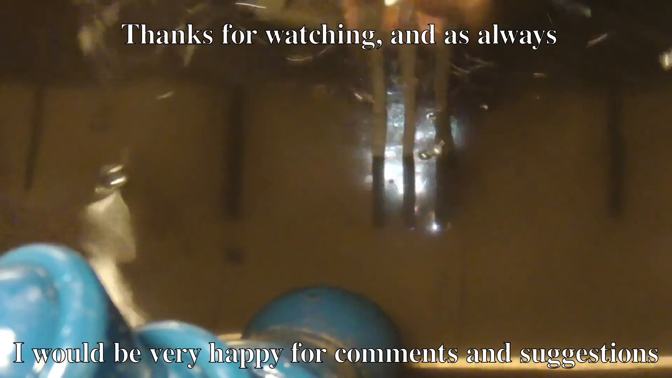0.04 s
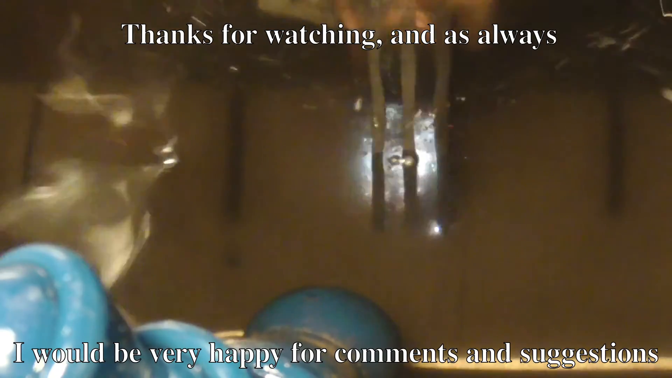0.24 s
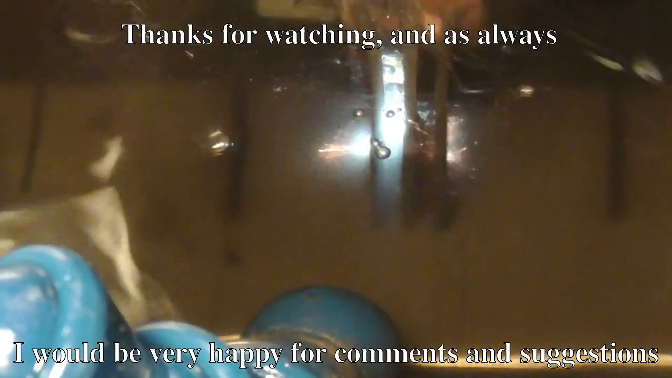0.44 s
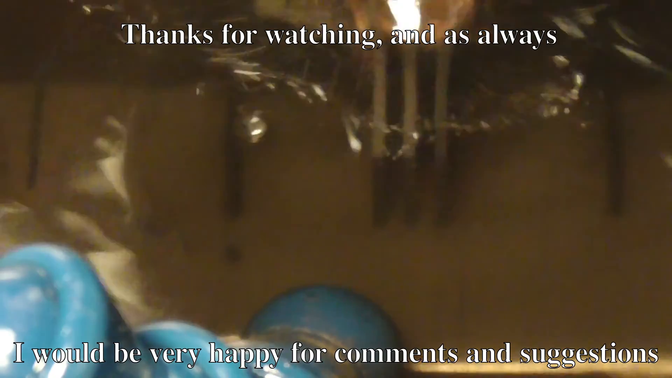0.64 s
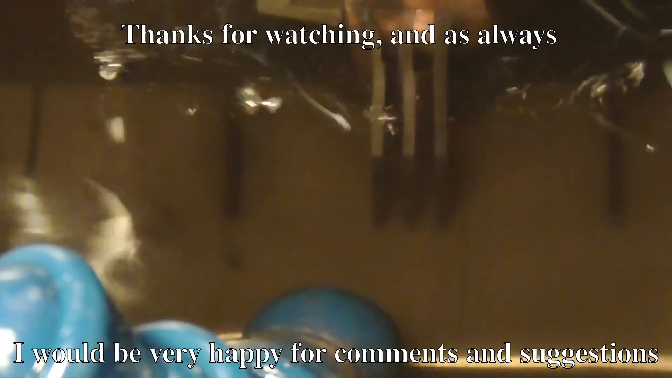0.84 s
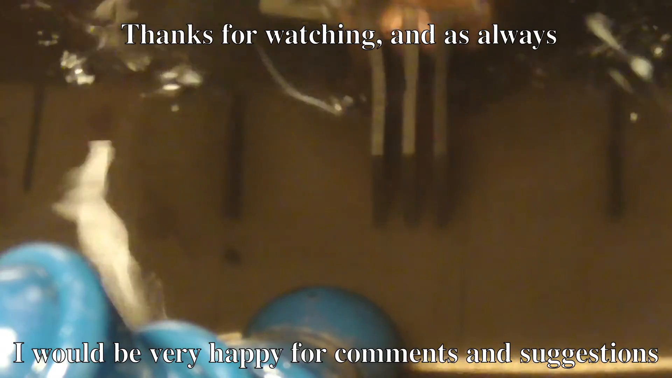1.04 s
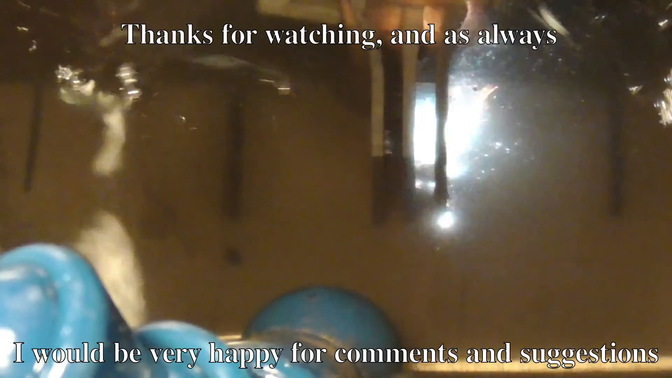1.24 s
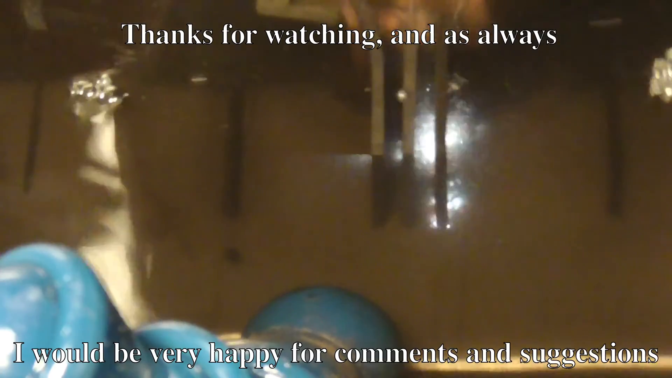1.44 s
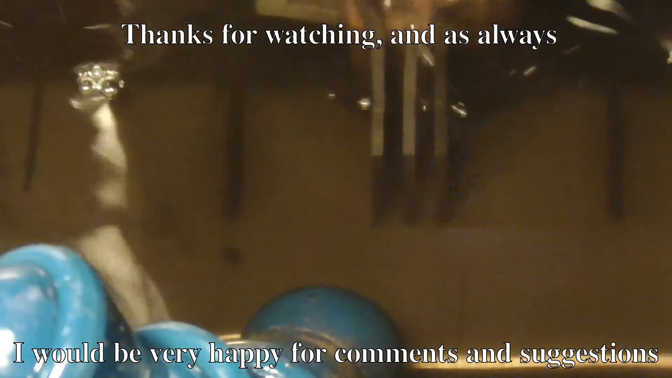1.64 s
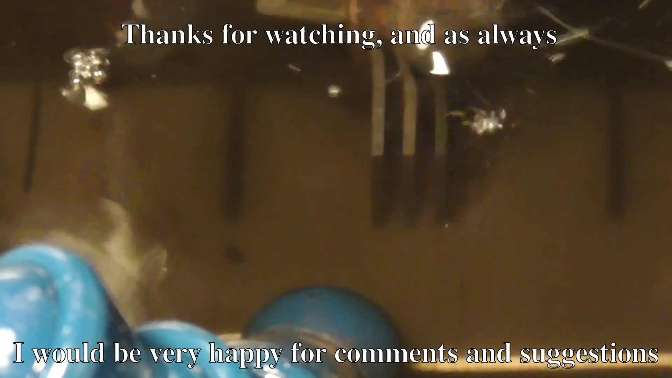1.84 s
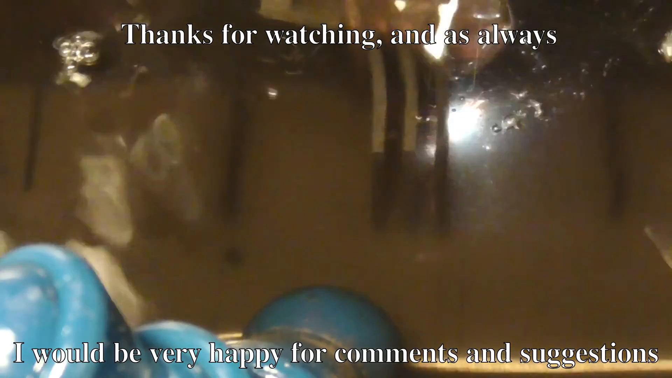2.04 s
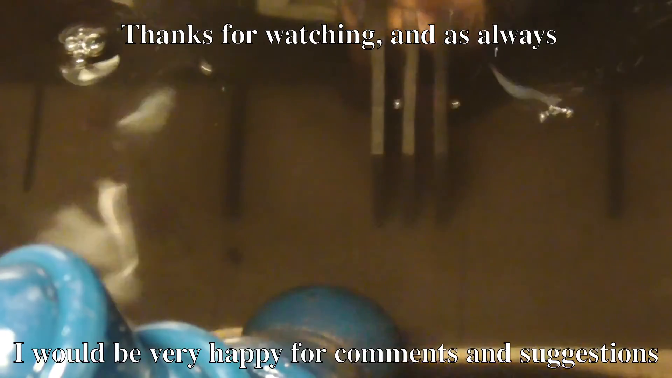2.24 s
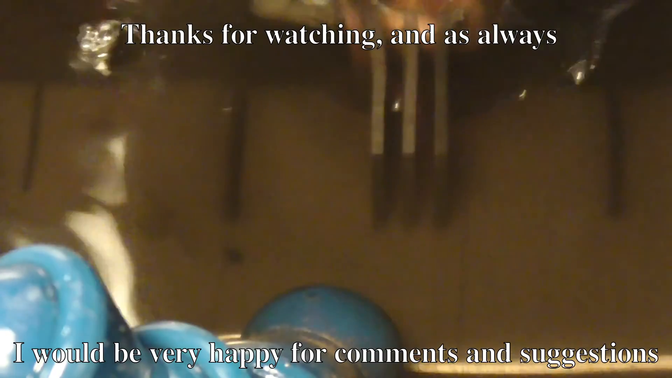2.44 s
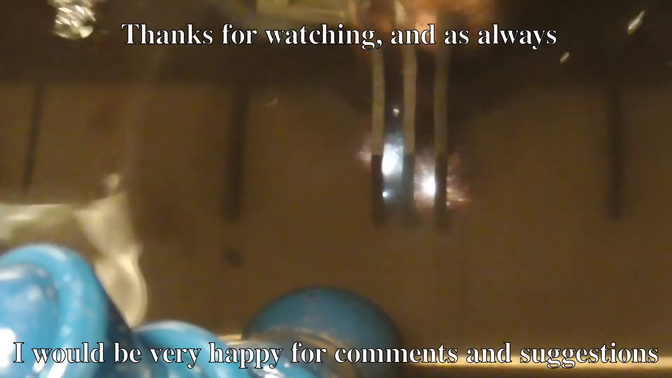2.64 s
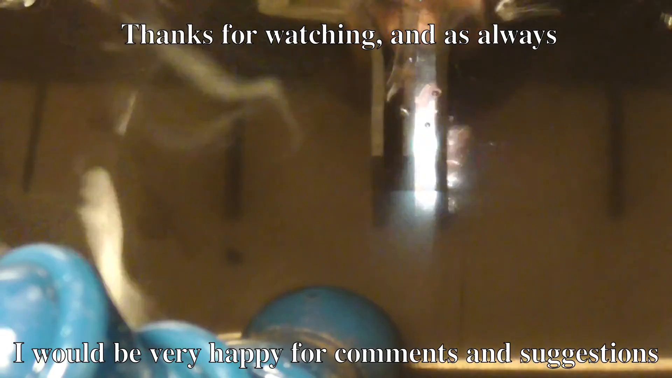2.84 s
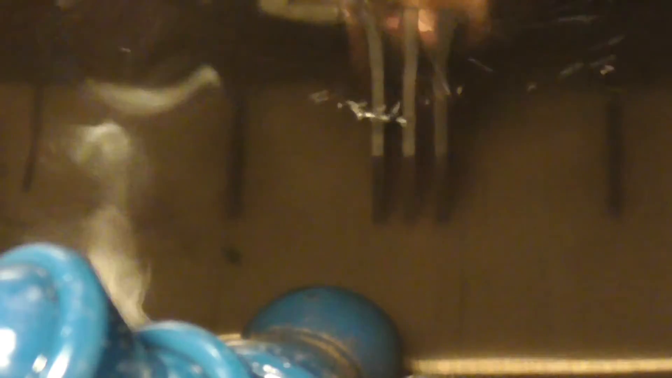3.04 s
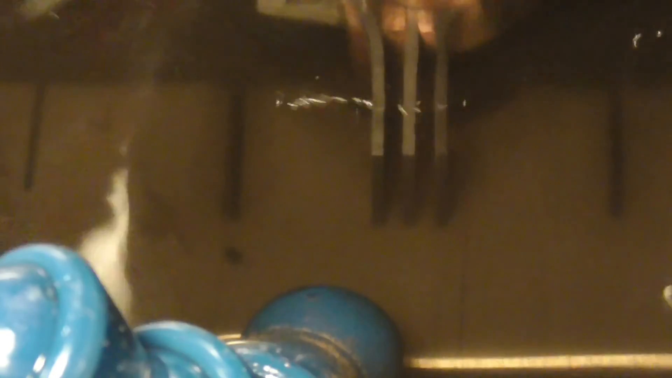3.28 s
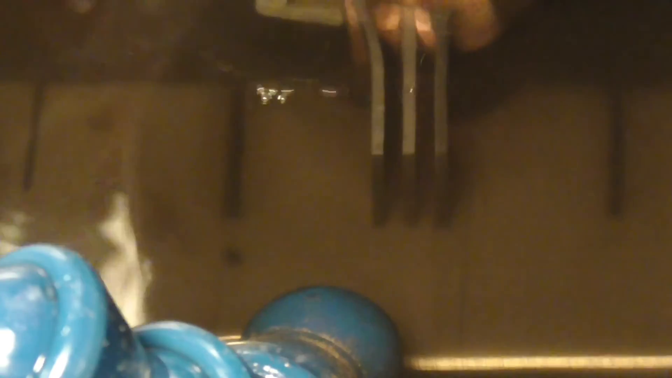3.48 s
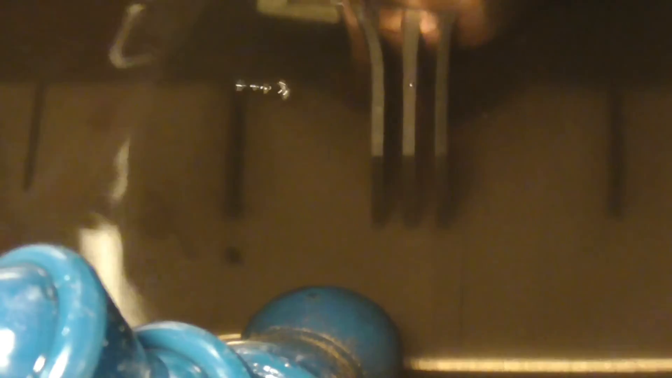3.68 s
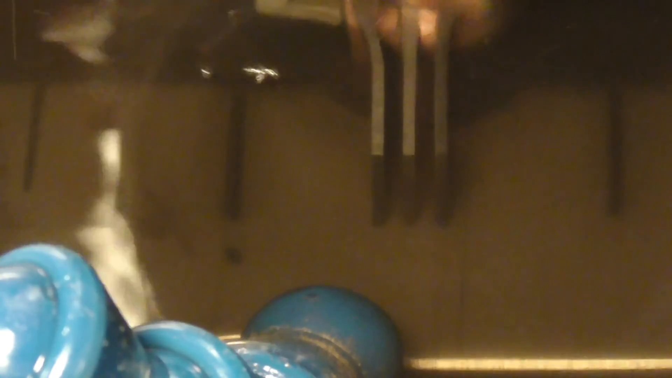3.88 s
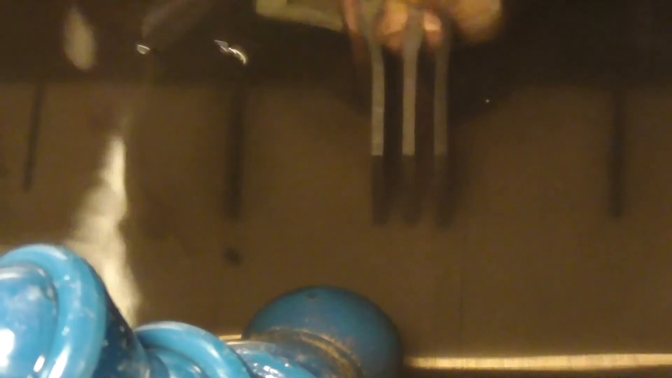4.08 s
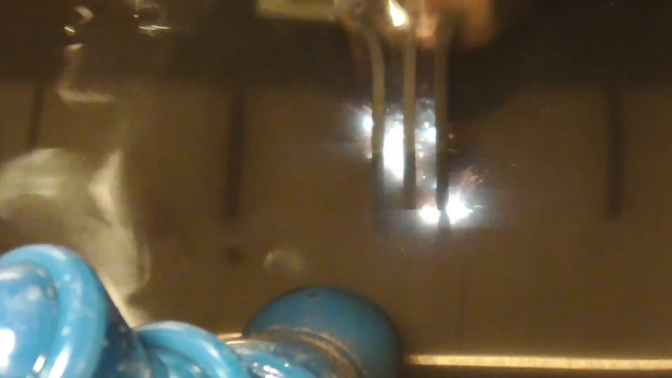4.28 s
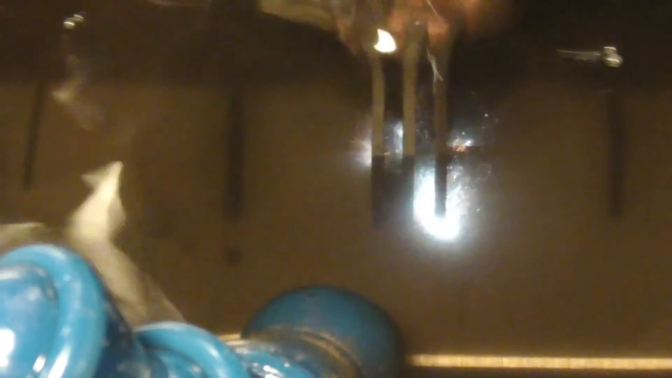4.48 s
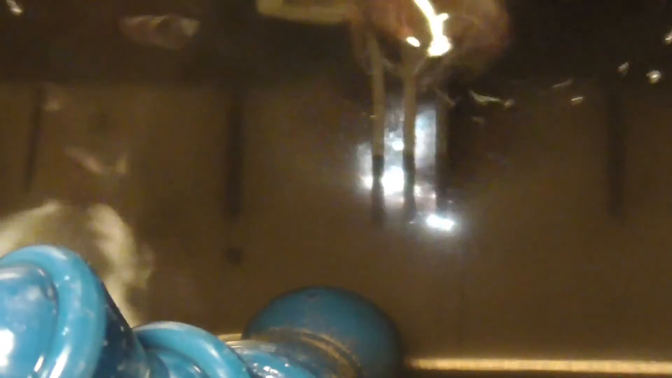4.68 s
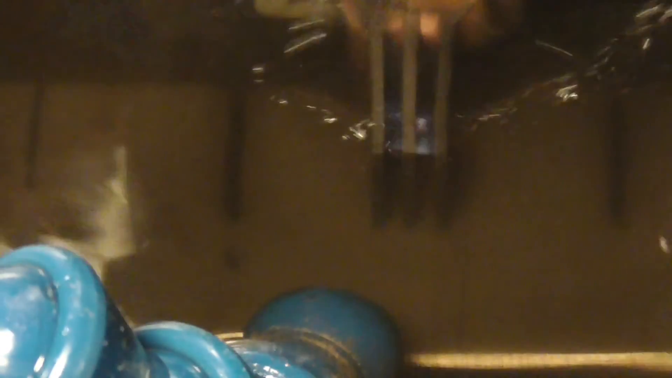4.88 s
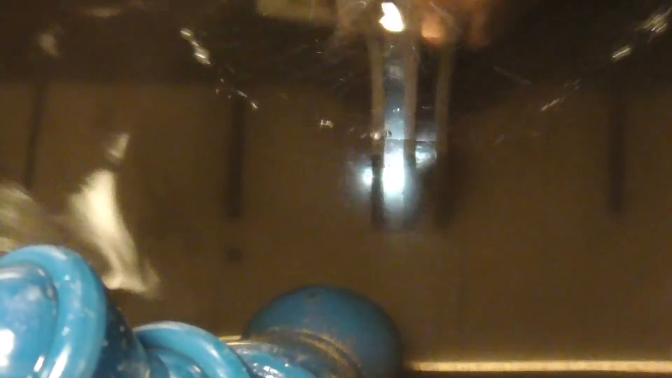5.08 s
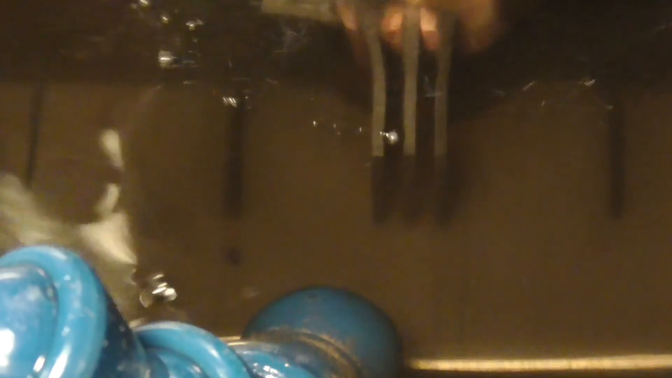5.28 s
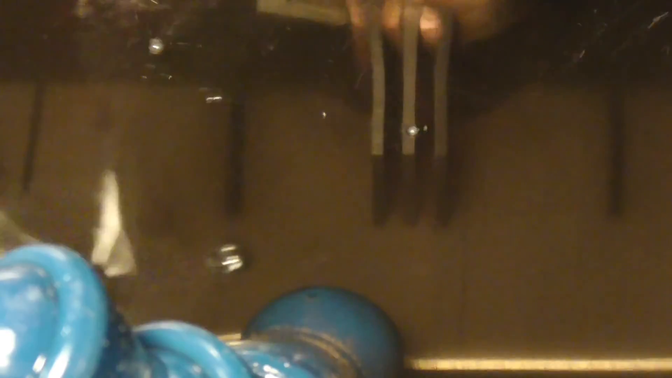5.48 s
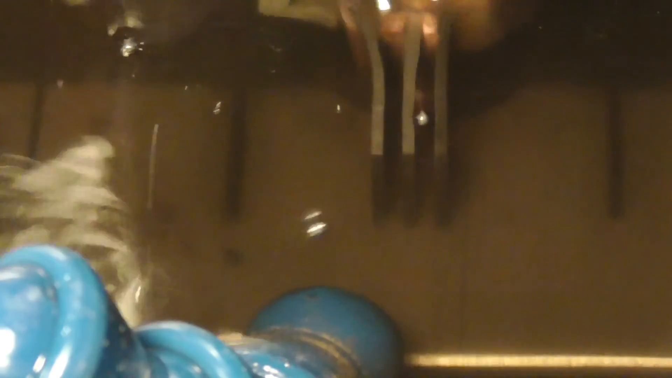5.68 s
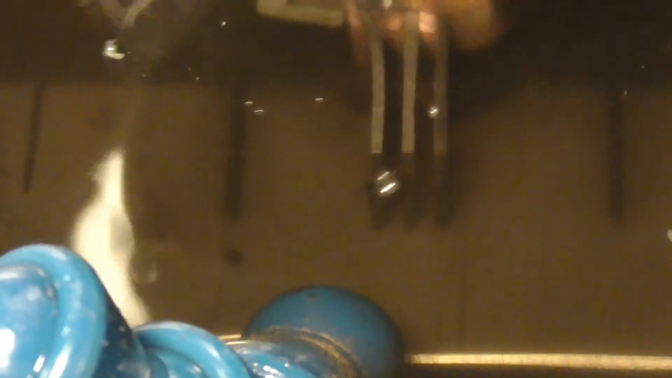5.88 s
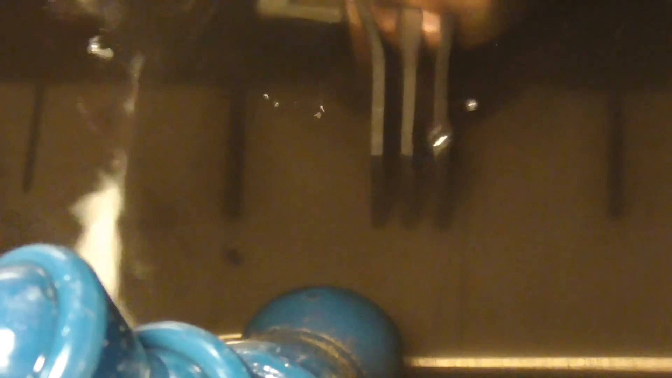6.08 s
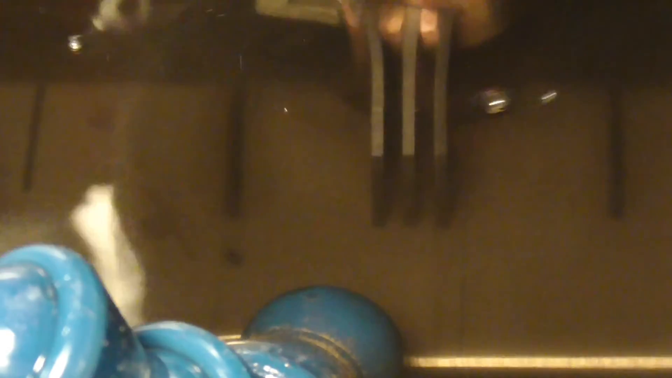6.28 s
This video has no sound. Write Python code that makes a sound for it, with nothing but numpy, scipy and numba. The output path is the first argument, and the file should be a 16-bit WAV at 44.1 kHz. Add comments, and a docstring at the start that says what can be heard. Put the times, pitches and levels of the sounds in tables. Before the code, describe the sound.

A steady pump and transformer hum with a rushing noise, leaning left, runs throughout. From 0 to 0.7 s, sharp electric snaps in liquid crackle in quick clusters, with brief sizzling arcs, hollow knocks and low pushes of gas, strongest near 0.6 s. Hum alone swells back until 1.33 s, when hard snaps return; from 1.5 to 1.72 s a long wet, buzzing arc sizzles with bubbly ringing, then separate cracks continue to about 2.2 s. After a pause, a strong snap at 2.66 s starts another cluster lasting to 3.1 s. Only the hum remains, rising, until 4.3 s, when a fizzing, bubbling arc runs to 4.7 s, ending in loud cracks near 4.75 s. Pairs of snaps follow at 4.9, 5.0, 5.1 and 5.2 s. From 5.3 s the hum recovers alone to the end. Close pickup, short workshop reverberation, dull extreme treble.

```python
"""A sharp snap over a steady hum, then more snaps in quick clusters and stretches of sizzling arc.
Electrodes spark in a liquid bath: each spark is a filtered impulse that rings its own gas pocket.
An arc is a dense swarm of small discharges; gas pockets knock, push and break up around them.
Pump and transformer lines hum over a rush of shaped noise, from the left.
A gain control ducks under the sparks and lets the hum swell back in the pauses."""
import sys
import numpy as np
from scipy import signal
from scipy.fft import rfft, irfft, next_fast_len
from scipy.io import wavfile
from scipy.ndimage import uniform_filter1d, map_coordinates
from numba import njit

SR = 44100
rng = np.random.default_rng(int(sys.argv[2]) if len(sys.argv) > 2 else 0)


def transcribe(signal):
    """Save signal, clipped to [-1, 1], as a 16-bit WAV file at the path in sys.argv[1]."""
    frames = np.atleast_2d(signal).T
    limited = np.clip(frames, -1, 1)
    pcm = np.round(limited * 32767).astype(np.int16)
    wavfile.write(sys.argv[1], SR, pcm)


N = 278712  # length in samples
# All levels below hold before the gain control.


def amp(db):
    """Logarithmic level: decibels to amplitude gain."""
    return 10 ** (np.asarray(db) / 20)


def unit(x):
    """Normalisation by mean power: x scaled to rms 1."""
    return x / np.sqrt(np.mean(x ** 2) + 1e-20)


def along(points, hz):
    """Interpolation over logarithmic frequency of (Hz, value) points."""
    f, v = np.transpose(points)
    return np.interp(np.log(hz + 1), np.log(f + 1), v)


def bumps(rows, hz):
    """Sum of Gaussian peaks and dips, in dB, from rows of (Hz, half width Hz, dB)."""
    return sum(db * np.exp(-.5 * ((hz - centre) / width) ** 2) for centre, width, db in rows)


def wobble(rate):
    """Band-limited random modulation: a smooth curve through `rate` random knots a second."""
    knots = rng.standard_normal(int(N * rate / SR) + 4)
    return map_coordinates(knots, [np.arange(N) * rate / SR])


def filtered(x, response):
    """Linear filtering: the spectrum of x times a response of frequency."""
    m = next_fast_len(N + SR // 2)
    return irfft(rfft(x, m) * response(np.fft.rfftfreq(m, 1 / SR)), m)[..., :N]


def causal(db):
    """Minimum phase: a response with these gains that rings only after it is struck."""
    cepstrum = irfft(np.log(amp(db)))
    half = cepstrum.shape[-1] // 2
    fold = np.r_[1, np.full(half - 1, 2), 1, np.zeros(half - 1)]
    return np.exp(rfft(cepstrum * fold))


def coloured(x, db_at, size=2048):
    """Convolution: channels of x through a causal filter with the gain db_at(Hz)."""
    answer = irfft(causal(db_at(np.fft.rfftfreq(size, 1 / SR))))
    return signal.fftconvolve(x, answer[None], axes=1)[:, :N]


def gliding_ring(x, hz, width_hz):
    """Resonance with a moving centre: x shifted to 0 Hz, smoothed by one pole and shifted back."""
    carrier = np.exp(2j * np.pi * np.cumsum(hz) / SR)
    keep = np.exp(-np.pi * width_hz / SR)
    return unit(np.real(carrier * signal.lfilter([1], [1, -keep], x / carrier)))


def add(track, s, sound):
    """Superposition: mix a sound into a track at time s."""
    start = max(round(s * SR), 0)
    track[..., start:start + sound.shape[-1]] += sound[..., :max(N - start, 0)]


# pump and transformer lines: pitch_hz, level_db (rms), left_minus_right_db, left_lead_rad
HUM = [(100, -74.5, -2, 0), (200, -67, 1, .1), (217.7, -55.5, 3, .2), (243.2, -67, 0, -.1),
       (301.5, -70, 0, .4), (314.1, -67, -2, .6), (384, -68, -1, .3), (514, -72, -2, .4),
       (640, -65, -2, .6), (653.1, -59.3, -2, .8), (738, -73, 1, .9), (771, -74, 1, .7), (1007, -80, 0, .5),
       (2309, -90, 0, 0), (8909, -91, 0, 0), (11461, -99, 0, 0)]
# spectrum of the running pump's rush: frequency_hz, relative_level_db (per Hz)
PUMP = [(30, -44), (85, -24), (150, -11), (200, -12), (350, -11), (500, -6), (700, -10), (950, -13),
        (1210, -18), (1450, -20), (1700, -27), (2900, -28.5), (3500, -26.5), (4300, -27), (4850, -35),
        (6000, -39.5), (7000, -33.5), (8300, -32), (10000, -35.5), (14000, -42), (16300, -49)]
# resonances of the pump and its pipes: centre_hz, half_width_hz, gain_db
PUMP_BODY = [(254.5, 18.8, 14.5), (311.5, 20.2, 14.5), (381.2, 18.6, 12), (454, 22, 6), (561, 42, 7.5),
             (639, 29, 9), (784, 14, 5.5), (838, 42, 7.5), (1051, 58, 7.5), (1335, 54, 10.5),
             (2280, 260, 5), (9100, 55, 5), (11800, 74, 1)]
# stereo width of the rush: frequency_hz, side_minus_mid_db
WIDTH = [(30, 22), (110, -16), (200, -7.5), (380, -10), (700, -4), (2400, -7), (4400, -3), (6000, 3),
         (8100, -13), (15000, -22)]


def machine():
    """Tonal and broadband noise: slightly unsteady hum lines over a resonantly shaped rush."""
    t, sides = np.arange(N) / SR, np.array([[.5], [-.5]])
    lines = np.zeros((2, N))
    for hz, db, left_db, lead in HUM:
        drift = 0.038 * np.sqrt(hz / 200) * wobble(3.9)
        phase = rng.uniform(0, 2 * np.pi) + lead * sides  # standing waves differ from ear to ear
        gain = np.sqrt(2) * amp(db + left_db * sides + 1.0 * wobble(5))
        lines += gain * np.sin(2 * np.pi * hz * t + drift + phase)

    def body(hz):
        return amp(along(PUMP, hz) + bumps(PUMP_BODY, hz))

    mid = filtered(rng.standard_normal(N), body)
    side = filtered(rng.standard_normal(N), lambda hz: body(hz) * amp(along(WIDTH, hz)))
    rush = amp(-52.0 + 0.075 * wobble(8.8)) * unit(np.array([mid + side, mid - side]))
    lean = [(60, -2.0), (130, 13.0), (260, -3.0), (520, 1.0), (1500, 2.0)]  # Hz, left minus right dB
    # the pump stands to the left; the left ear's lead fades out in the treble
    lead_s, lead_fade_hz = .00004, 1500

    def placed(hz):
        delay = lead_s * sides / (1 + (hz / lead_fade_hz) ** 2)
        return amp(along(lean, hz) * sides) * np.exp(2j * np.pi * hz * delay)

    return lines + filtered(rush, placed)


# current leaks between the electrodes while they are close: start_s, end_s, level_db
LEAKS = [(0, 0.674, -60.5), (1.446, 2.165, -60), (2.667, 2.876, -62), (2.913, 3.066, -59.5),
         (4.278, 5.256, -61), (4.962, 4.968, -52.5), (5.048, 5.09, -59)]
# spectrum of gas forming on the electrodes: frequency_hz, relative_level_db (per Hz)
HISS = [(300, -2), (2000, 2), (3700, 4), (5200, 12), (6500, -4), (9600, 12), (12000, -5), (16000, -9)]


def leak():
    """Broadband bubble noise: around the sparks, fine gas bubbles hiss on the electrodes."""
    strength = np.zeros(N)
    for start, end, db in LEAKS:
        strength[max(int(start * SR), 0):int(end * SR)] = amp(db)
    noise = rng.standard_normal((3, N))
    shared_and_own = noise[0] + 0.41 * noise[1:]
    hiss = unit(filtered(shared_and_own, lambda hz: amp(along(HISS, hz))))
    return uniform_filter1d(strength, size=220) * amp(3.3 * wobble(40)) * hiss


def splinter(count, spread_s, apart, above_hz, lag_hz, size=4096):
    """Scattering: stereo impulse spectra, their middle smeared by the liquid, their treble by the walls."""
    t, hz = np.arange(size) / SR, np.fft.rfftfreq(size, 1 / SR)
    noise = rng.standard_normal((count, 3, size))
    burst = (noise[:, :1] + apart * noise[:, 1:]) * np.exp(-(t / spread_s) ** 1.31)
    scattered = rfft(burst / np.linalg.norm(burst, axis=-1, keepdims=True))
    low = 1 / (1 + np.sqrt(2) * 1j * hz / above_hz - (hz / above_hz) ** 2)
    pole = 1 + 1j * hz / lag_hz - (hz / lag_hz) ** 2  # all-pass: delays without colouring
    return -low * np.conj(pole) / pole * (1 - (hz / above_hz) ** 2 * scattered)


# single discharges: start_s, level_db (relative slap level), pitch_hz (gas pocket), then over the slap:
# pocket_ring_db, hollow_note_db (of the tank), small_bubbles_db
SPARKS = [(0.0005, 3.5, 1440, 5, -6.5, 3), (0.0374, 4, 1440, 4.5, -4, 4), (0.0488, -4.5, 1520, 4, -1, 13),
          (0.0931, 4, 1320, 3, -4, 1), (0.1456, 6, 1490, 0, -1, 4), (0.15, 3.5, 1470, 6, -2, 3),
          (0.2719, 9, 1360, 3, -12, 2), (0.294, 13.5, 1380, 0.5, -15.5, -1.5),
          (0.344, 11, 1560, 6, -15, 5.5), (0.42, 5, 1510, 3, -6.5, 2), (0.4473, 9.5, 1480, 4.5, -13, 4),
          (0.46, 5.5, 1620, 8, -14, 4), (0.5735, 16, 1460, 6, -23, -3), (0.6025, 15.5, 1525, 5.5, -15, -5),
          (0.614, 2, 1480, -1, -12, 11), (0.624, 2, 1520, 8.5, -5, 2), (0.6662, 13, 1480, 2.5, -15, 7),
          (0.6766, 10, 1510, 9, -11, 4), (0.683, 7.5, 1520, 8, -14, 8.5), (0.6926, 10.5, 1510, 10, -17, 1),
          (1.3355, 15, 1440, 4, -14.5, -8), (1.3715, 11.5, 1460, 7.5, -8, -0.5),
          (1.385, 2, 1470, 11, -4, 2), (1.392, 2.5, 1460, 10, -2, 2), (1.4882, 12.5, 1450, 3, -9.5, 4.5),
          (1.5016, 4, 1450, 3, 3, 3), (1.5344, 2.5, 1460, 5, -1, 5.5), (1.562, -7, 1450, 12, 5, 4),
          (1.5718, -4.5, 1425, 4.5, 7, 15), (1.5818, 1, 1400, 8, 1, 2), (1.591, -6, 1435, 6, 6, 14),
          (1.601, -13, 1450, 22, -6, -2), (1.622, -6, 1440, 18, 2, 5), (1.642, -9.5, 1390, 16, 0, -2),
          (1.661, -8, 1370, -6, 5, 4), (1.6836, 0.5, 1400, 8, -3, 3), (1.691, -5, 1380, 10, -4, -2),
          (1.699, -6, 1380, 9, -2, 0), (1.707, -8, 1392, 6, -1, 5), (1.713, -5, 1389, 10, -5, 0),
          (1.7405, -1, 1415, 10, 4.5, 3), (1.7532, 7.5, 1430, 7, -6, -3), (1.791, 12.5, 1410, 5, -7, -6),
          (1.863, 5, 1440, -1, 4.5, 0), (1.8679, 8, 1350, 2.5, -2.5, -4), (1.8855, 11.5, 1460, 5, -9, -3),
          (1.923, 10.5, 1560, 9, -14, 1), (2.002, 6, 1340, 3.5, -4.5, 0), (2.0121, 8.5, 1330, 7, -3, 2),
          (2.0474, 11.5, 1520, 7, -7.5, 3.5), (2.0647, 12, 1440, 6.5, -9, -1),
          (2.0996, 11, 1495, 9.5, -13, 0.5), (2.178, 14, 1430, 9, -18, 4), (2.6573, 16.5, 1455, 5, -22, -7),
          (2.7116, 11.5, 1510, 9, -19, 1.5), (2.787, 3, 1450, 7, -2, 4), (2.7933, 6.5, 1414, 5.5, -5, 1),
          (2.8236, 7.5, 1470, 9, -1.5, 3), (2.8308, 4, 1410, 10, -10, 7.5), (2.8382, 2, 1470, 5, -8, 1),
          (2.97, 12, 1426, 5.5, -12, -2), (2.9823, 6, 1400, 1, -8, 2), (2.99, 0.5, 1350, -4, -3, 5.5),
          (2.995, -5, 1390, 3, -0.5, 1), (3.011, -6, 1390, 3, -2, 13), (3.026, -9, 1400, 4, -7, 13),
          (3.033, -12, 1410, 5, 2, 9), (3.0709, -4.5, 1423, 16, 4.5, 16.5), (4.3104, 3, 1430, 6, -5.5, 7),
          (4.322, -5, 1340, 4, -5, 3), (4.3252, -6, 1404, 4, -2, -2), (4.344, -6, 1437, 7, 0, 8),
          (4.376, -8, 1567, 12, -5, 11), (4.3991, 0, 1557, 8.5, -11, 1), (4.422, -8, 1517, 11.5, -5, 5),
          (4.428, -6.5, 1520, 10, 1, 13), (4.44, -9, 1507, 5, -2, 9), (4.461, -4, 1493, 3, -10, 15),
          (4.477, -9, 1430, 21, -8, -2), (4.491, -8, 1448, 8, -5, -7), (4.507, -18, 1430, 3, -3, 8),
          (4.521, -15, 1420, -3, -2, 8), (4.532, -1, 1428, 10, 1, 6), (4.542, -6.5, 1400, 5, 2, 7),
          (4.575, -9, 1355, 7.5, 3, 7), (4.5998, -7, 1310, 9, -2, 2), (4.644, -6, 1320, 5, 5, 5),
          (4.66, -11, 1328, -1, 6, 15), (4.687, -3, 1317, -3, 3, 0), (4.72, 7.5, 1310, -3, -5.5, -2.5),
          (4.7423, 13.5, 1306, -1.5, -11, -6), (4.7762, 16, 1550, 1, -13, -3), (4.7822, -2, 1570, 9, 1, 13),
          (4.787, 7, 1380, 0, -6, -3), (4.877, 6, 1350, 6, -7, 8.5), (4.8906, 7.5, 1426, 3, -4, 4),
          (4.896, 6, 1380, 10.5, -8, -2), (4.901, 5, 1320, 7, -7, -3), (4.9974, 12.5, 1460, 7.5, -13, 0.5),
          (5.003, 3.5, 1520, 11, 0, 1), (5.0975, 13, 1410, 4, -10.5, 1), (5.107, 5.5, 1380, -43, -5.5, -47),
          (5.191, 9.5, 1390, 4.5, -6.5, 1), (5.201, 8.5, 1360, 7, -6, 3), (5.2513, 2.5, 1380, 5, -6, 2)]
# colour of one discharge in the tank: frequency_hz, relative_level_db
SNAP = [(20, -66), (70, -80), (200, -12.5), (400, -14), (650, -3), (880, -0.5), (1170, -17), (1450, -11),
        (2000, 5.5), (3050, -10.5), (3700, -3), (5600, -20), (7000, -16.5), (14000, -22.5), (16000, -38.5)]
# sparks wander over the electrodes, their brightness drifts: time_s, then over the slap:
# treble_db, top_octave_db
DRIFT = [(0, 6.5, 7.5), (.15, 3.5, 6), (.28, -1.5, 0.5), (.45, 0.5, -1), (0.599, 2, -2), (1.35, 2, 2.5),
         (1.5, 2, 6), (1.75, -3, -2.5), (2.1, -2, -4), (2.2, 3, -6), (2.65, -2.5, 4.5), (2.8, 4.5, 2),
         (3, 7, 6.5), (4.3, 6.5, 11), (4.55, -1, 1), (4.731, -2.5, -2), (4.88, 1.5, 3.5), (5, 6.5, 3),
         (5.1, 2.5, 6), (5.25, 4, 6)]


def sparks(pops, size=4096):
    """Impulse response: each discharge strikes the tank and rings its own gas pocket."""
    out, hz = np.zeros((2, N)), np.fft.rfftfreq(size, 1 / SR)
    blows = splinter(len(SPARKS + pops), spread_s=0.0019, apart=0.18, above_hz=2480, lag_hz=2200)
    drift_s, *brightness = np.transpose(DRIFT)
    for (s, db, ring_hz, ring_db, hollow_db, bead_db), blow in zip(SPARKS + pops, blows):
        treble_db, top_db = (np.interp(s, drift_s, column) for column in brightness)
        tilt = along([(900, 0), (2100, hollow_db), (3700, bead_db), (7500, treble_db), (12500, top_db)], hz)
        # power curve of the pocket's resonance
        pocket = np.minimum(hz / ring_hz, 1) / (1 + ((hz - ring_hz) / 102) ** 2) ** 1.2
        power = amp(along(SNAP, hz) + tilt) ** 2 + amp(ring_db) ** 2 * pocket
        # the scattering ripples the spectrum but keeps its broad balance
        broad = uniform_filter1d(np.mean(np.abs(blow) ** 2, axis=0), size=70)
        add(out, s, irfft(blow * causal(10 * np.log10(power / broad) + db)))
    return out


# spectrum of a collapsed pocket's fragments: frequency_hz, relative_level_db (per Hz)
FRAGMENTS = [(30, -50), (200, -22), (600, -4.5), (1100, 6.5), (1800, -13.5), (2800, -9.5), (4400, -14),
             (5600, -10), (14000, -18), (16000, -50)]
# rate, level relative to the spark, decay time constant
FRAGMENTS_PER_S, FRAGMENTS_DB, FRAGMENTS_LIFE_S = 700, -54, 0.018


def fragments():
    """Bubble break-up: after each spark its pocket dies in a short, uneven crackle of random impulses."""
    blows = np.zeros(N)
    for s, db, *_ in SPARKS:
        blows[max(round(s * SR), 0)] = amp(db + FRAGMENTS_DB)
    dying = signal.lfilter([1], [1, -np.exp(-1 / (FRAGMENTS_LIFE_S * SR))], blows)
    size = np.clip(rng.standard_normal((3, N)), -2, 2)
    ticks = (rng.random(N) < FRAGMENTS_PER_S / SR) * (size[0] + 0.83 * size[1:])
    return dying * unit(coloured(ticks, lambda hz: along(FRAGMENTS, hz)))


# standing waves in the liquid: centre_hz, half_width_hz, gain_db
STANDING = [(1153, 45, -6.5), (1352, 18, 2.5), (1685, 29, -4), (1950, 60, 3), (3240, 43, -10.5),
            (3380, 146, 0.5), (4084, 50, -6), (5440, 140, -4.5)]


def standing_waves(discharges):
    """Modal colouring: standing waves in the liquid lift and cut bands of every discharge."""
    return coloured(discharges, lambda hz: bumps(STANDING, hz))


# modes of the tank walls: pitch_hz, relative_level_db, t60_s
TANK = [(884, -45, .11), (1012, -39, .14), (1090, -43, .13), (1195, -43, .16), (1512, -50, .05),
        (2084, -42, .08), (2579, -49, .08), (3135, -48, .12), (3543, -43, .045), (4380, -47, .06)]


def tank_ring(x, db):
    """Modal decay: the walls of the tank ring on faintly after every blow."""
    t = np.arange(SR // 4) / SR
    ring = sum(amp(level - 60 * t / t60) * np.cos(2 * np.pi * hz * t) for hz, level, t60 in TANK)
    return amp(db) * signal.fftconvolve(x, ring[None], axes=1)[:, :N]


# gas bursts that shove the liquid: start_s, relative_level_db
SHOVES = [(.001, -33), (0.035, -34), (0.147, -34.5), (0.667, -40), (1.335, -28), (1.487, -28.5),
          (4.31, -29.5), (4.742, -35), (4.779, -33)]
SHOVE_HZ = 145.4  # swing of a large gas pocket


def shoves():
    """Damped oscillation: a large gas pocket swells and falls back in a low, brief push."""
    out, cycles = np.zeros((2, N)), SHOVE_HZ * np.arange(SR // 8) / SR
    swell = np.sin(2 * np.pi * cycles) * cycles * np.exp(1 - 2.55 * cycles)
    for s, db in SHOVES:
        add(out, s, amp(db + rng.standard_normal((2, 1))) * swell)
    return out


# large gas pockets that knock and ring on: start_s, pitch_hz, level_db (before onset and decay), t60_s
KNOCKS = [(.001, 1020, -25, 0.013), (0.048, 1030, -38, 0.045), (.094, 910, -37, 0.065),
          (.236, 1075, -41, .1), (0.273, 1115, -30.5, 0.054), (0.294, 1080, -28, 0.039),
          (0.42, 1020, -41, 0.076), (0.45, 1018, -34, 0.11), (.575, 1004, -23, 0.044),
          (0.615, 1004, -30, 0.05), (.677, 995, -27, 0.059), (4.723, 1280, -37, 0.068),
          (4.743, 1106, -28, 0.078)]
KNOCK_SAG_PER_S = 0.58  # share of its starting pitch that a swelling pocket loses in a second
KNOCK_ROUGH, KNOCK_CHURN_PER_S = 1, 177  # churning liquid shakes the ring's phase: radians, knots a second


def knocks():
    """Bubble resonance: a large pocket rings roughly near the tank's note and sinks as it swells."""
    out, t = np.zeros((2, N)), np.arange(SR // 8) / SR
    for s, hz, db, t60 in KNOCKS:
        sinking = 2 * np.pi * hz * (t - KNOCK_SAG_PER_S * t ** 2 / 2)
        phase = sinking + KNOCK_ROUGH * wobble(KNOCK_CHURN_PER_S)[:len(t)]
        onset = 1 - np.exp(-t / 0.00088)
        add(out, s, amp(db - 60 * t / t60) * onset * np.sin(phase))
    return out


# reverberation of the workshop: frequency_hz, t60_s
ROOM = [(200, .26), (1500, .21), (5000, .17), (14000, .14)]


def workshop(x, wall_db, wall_s, tail_db, apart, size=4096):
    """Reverberation: one near wall and a short diffuse tail, ever new as the liquid keeps moving."""
    out = np.zeros((2, N))
    for start in range(0, N, size):
        hz, t, z = signal.stft(rng.standard_normal((3, SR // 4)), SR, nperseg=256)
        decay = amp(-60 * t / along(ROOM, hz)[:, None])
        noise = signal.istft(z * decay, SR, nperseg=256)[1]
        tail = noise[:1] + apart * noise[1:]
        age = np.arange(tail.shape[1]) / SR
        wall = tail * (age > wall_s) * np.exp(-np.abs(age - wall_s) / 0.0076)
        tail = tail * (age > .003)
        wall_part = amp(wall_db) * wall / np.linalg.norm(wall[0])
        answer = wall_part + amp(tail_db) * tail / np.linalg.norm(tail[0])
        add(out, start / SR, signal.fftconvolve(x[:, start:start + size], answer, axes=1))
    return out


# stretches of sizzling arc: start_s, end_s, relative_level_db, pitch_hz (gas pocket at the start),
# then over the sizzle: pocket_ring_db, small_bubbles_db
ARCS = [(0.146, 0.184, -39.5, 1560, -17, -13), (0.217, 0.24, -33.5, 1447, -16, -7),
        (0.343, 0.369, -34, 1546, -6, -10), (0.41, 0.416, -32, 1445, -8, -10),
        (0.445, 0.504, -47.5, 1500, -11, 5), (.535, 0.546, -36, 1450, -2, 2),
        (0.664, 0.701, -41, 1500, 0, -11), (1.505, 1.599, -39, 1420, 6, 0.5),
        (1.6, 1.66, -36.5, 1440, 6, 0), (1.66, 1.717, -36.5, 1380, -1, -6),
        (1.734, 1.743, -33, 1347, -30, -2), (1.796, 1.82, -36.5, 1360, -12, -13),
        (1.924, 1.955, -38, 1470, -6, 0), (2.105, 2.118, -35, 1490, -4.5, 6),
        (2.718, 2.731, -37, 1500, -14, 1), (2.771, 2.777, -31.5, 1500, -15, 6.5),
        (2.986, 3.031, -41.5, 1380, -10, 3), (4.318, 4.372, -43.5, 1559, 0, -12),
        (4.385, 4.402, -41, 1550, 1, 5.5), (4.403, 4.434, -41.5, 1570, 1, 3),
        (4.437, 4.483, -36, 1520, 6, -7), (4.485, 4.56, -35, 1401, -1, 0.5),
        (4.558, 4.691, -37.5, 1382, 2, 0.5), (4.789, 4.831, -40, 1560, -29, 4)]
ARC_FADE_DB = 3.5  # each stretch fades by this much; touching stretches make one long sizzle
FULL_POCKET_HZ, GAS_S = 1340, 0.14  # the growing pocket moves towards this pitch, with this time constant


def arc_controls():
    """Gas growth: each stretch of arc starts at its own level and fades a little as its pitch shifts.

    Rows over time: gain, pocket pitch in Hz, pocket ring in dB, small bubbles in dB."""
    controls = np.zeros((4, N))
    for start, end, db, hz, pocket_db, bead_db in ARCS:
        i = np.arange(round(start * SR), round(end * SR))
        controls[0, i] = amp(db + ARC_FADE_DB * np.linspace(.5, -.5, len(i)))
        controls[1, i] = FULL_POCKET_HZ + (hz - FULL_POCKET_HZ) * np.exp((start - i / SR) / GAS_S)
        controls[2:, i] = [[pocket_db], [bead_db]]
    return uniform_filter1d(controls, size=130, axis=1)


BEAD_WANDER_HZ, POCKET_WANDER_HZ = 50, 45  # bubble sizes shift as the arc moves
# restriking: 1 / median gap, unevenness of the gaps, level over the arc, scatter
POPS_PER_S, POP_JITTER, POP_DB, POP_SCATTER_DB = 170, 0.35, 25, 1.5
# mean colour of a restrike over its slap: pocket_ring_db, hollow_note_db, small_bubbles_db
POP_COLOUR_DB = (8.5, -0.5, 8.5)


def stray_pops(strength, pocket_hz, count=1600):
    """Repeated breakdown: a burning arc restrikes in an uneven buzz, given as rows like those of SPARKS."""
    scatter = rng.standard_normal((count, 6))
    at = (np.cumsum(np.exp(POP_JITTER * scatter[:, 5])) * SR / POPS_PER_S).astype(int)
    pops = []
    for i, own in zip(at, scatter):
        if i < N and strength[i] > strength.max() / 10:
            db = 20 * np.log10(strength[i]) + POP_DB + POP_SCATTER_DB * own[0]
            hz = pocket_hz[i] + POCKET_WANDER_HZ * own[4]
            pops.append((i / SR, db, hz, *(POP_COLOUR_DB + POP_SCATTER_DB * own[1:4])))
    return pops


# small bubbles torn off by an arc: rate, centre pitch, spread of pitch, decay
BEADS_PER_S, BEAD_HZ, BEAD_SPREAD_HZ, BEAD_T60_S = 400, 3660, 160, 0.016


def beads(size=1024):
    """Bubble resonance: a shower of small bubbles, each ringing briefly around a wandering pitch."""
    chance = rng.standard_normal((int(BEADS_PER_S * N / SR), 2))
    born, t = rng.integers(0, N, (len(chance), 1)), np.arange(size) / SR
    hz = BEAD_HZ + BEAD_WANDER_HZ * wobble(35)[born] + BEAD_SPREAD_HZ * chance[:, 1:]
    level_db = 1.8 * np.clip(chance[:, :1], -2, 1.5) - 60 * t / BEAD_T60_S
    rings = amp(level_db) * np.sin(2 * np.pi * hz * t)
    return unit(np.bincount((born + np.arange(size)).ravel(), rings.ravel(), N)[:N])


# colour of the small discharges of an arc: frequency_hz, relative_level_db
SIZZLE = [(25, -61), (100, -19.5), (400, -14.5), (650, -4), (1150, -7), (1430, -14), (1720, -15),
          (2020, -9), (2850, -5.5), (3600, -6), (4650, -8.5), (5400, -15), (7000, -15), (13700, -21),
          (16000, -49)]
HOLLOW_HZ, HOLLOW_DB = 2034, -5  # the tank's hollow note under an arc, over the sizzle
TWITCH_DB, TWITCHES_PER_S = 2.5, 320  # the fizz comes in quick spurts: depth, knots a second


def arcs(strength, pocket_hz, pocket_db, bead_db):
    """Random impulse noise: a dense swarm of tiny discharges keeps the gas around it ringing."""
    ticks = (rng.random(N) < 1400 / SR) * amp(3 * np.clip(rng.standard_normal(N), -2, 2))
    # every tick is followed by a short fizz of collapsing bubbles
    fizz_decay = np.exp(-1 / (0.00074 * SR))
    fizz = signal.lfilter([1], [1, -fizz_decay], ticks) * rng.standard_normal((3, N))
    swarm = unit(ticks - ticks.mean()) + 0.53 * unit(fizz[0]) + 0.4 * unit(fizz[1:])
    spurts = amp(TWITCH_DB * wobble(TWITCHES_PER_S))
    sizzle = unit(coloured(swarm * spurts, lambda hz: along(SIZZLE, hz)))
    wandering_hz = pocket_hz + POCKET_WANDER_HZ * wobble(70)
    pocket = amp(pocket_db) * gliding_ring(fizz[0], wandering_hz, width_hz=89)
    hollow_gain = amp(HOLLOW_DB + 3.8 * wobble(21.94))
    hollow = hollow_gain * gliding_ring(fizz[1], HOLLOW_HZ + 70 * wobble(25), width_hz=300)
    bubbles = amp(bead_db + 1.8 * wobble(28)) * beads()
    return amp(-5.5) * strength * (sizzle + pocket + hollow + bubbles)


def scene():
    """Superposition of sources: the bath, a little to the right, in the humming workshop."""
    strength, pocket_hz, pocket_db, bead_db = arc_controls()
    discharges = sparks(stray_pops(strength, pocket_hz)) + arcs(strength, pocket_hz, pocket_db, bead_db)
    discharges = standing_waves(discharges + fragments())
    bath = (discharges + knocks() + leak() + shoves()) * amp([[-.45], [.45]])
    bath = bath + tank_ring(bath, db=-12.0)
    room = workshop(bath, wall_db=-16.5, wall_s=0.0051, tail_db=-20.0, apart=0.39)
    return bath + room + machine()


@njit
def follow(wanted, attack, release):
    """Attack and release: a gain cut in dB moves quickly up to what is wanted, then creeps back."""
    cut, now = np.empty(len(wanted)), 0.0
    for i in range(len(wanted)):
        now = now + (wanted[i] - now) * attack if wanted[i] > now else max(now - release, 0.0)
        cut[i] = now
    return cut


def gain_control(x, threshold_db, slope, attack_s, release_db):
    """Dynamic compression: turns down what passes the threshold; recovers release_db a second."""
    level = 10 * np.log10(np.abs(uniform_filter1d(np.mean(x ** 2, axis=0), size=128)) + 1e-12)
    wanted = slope * np.maximum(level - threshold_db, 0)
    return x * amp(-follow(wanted, 1 / (attack_s * SR), release_db / SR))


TOP_HZ = 16300  # nothing sounds above this


def record(dry):
    """Compression and band limiting: the gain control, a faint hiss after it and a sharp low-pass."""
    held = gain_control(dry, threshold_db=-40.5, slope=0.8, attack_s=0.0086, release_db=16.5)
    hiss = amp(-101) * rng.standard_normal((2, N))
    return filtered(held + hiss, lambda hz: hz < TOP_HZ)


dry = scene()
out = record(dry)
transcribe(out)
```